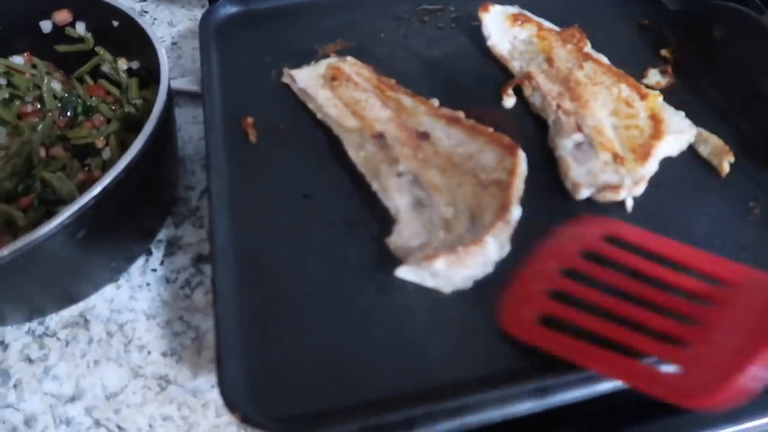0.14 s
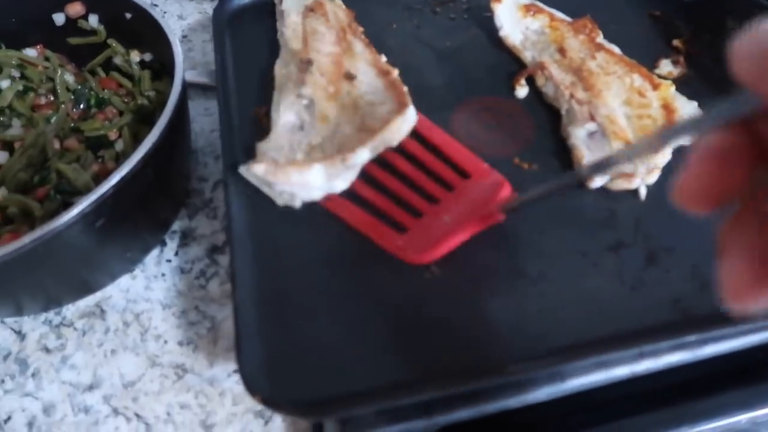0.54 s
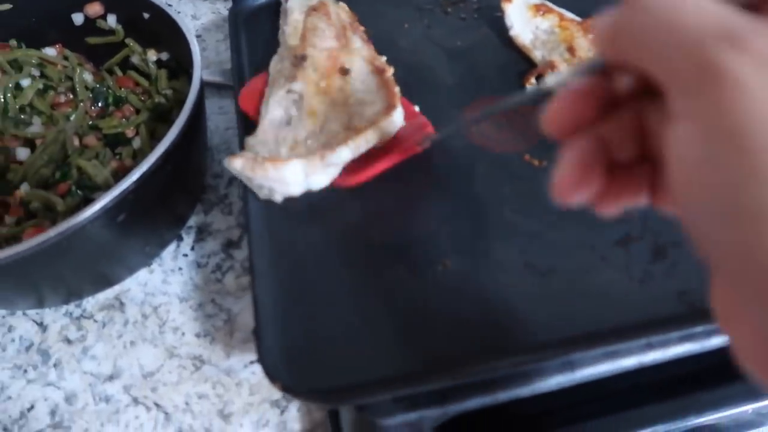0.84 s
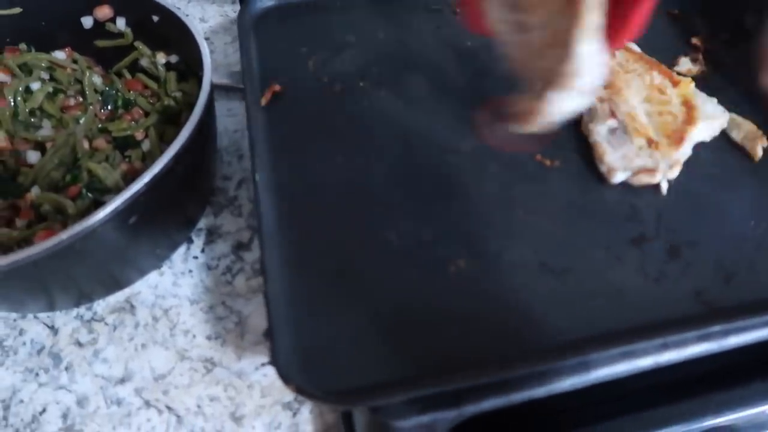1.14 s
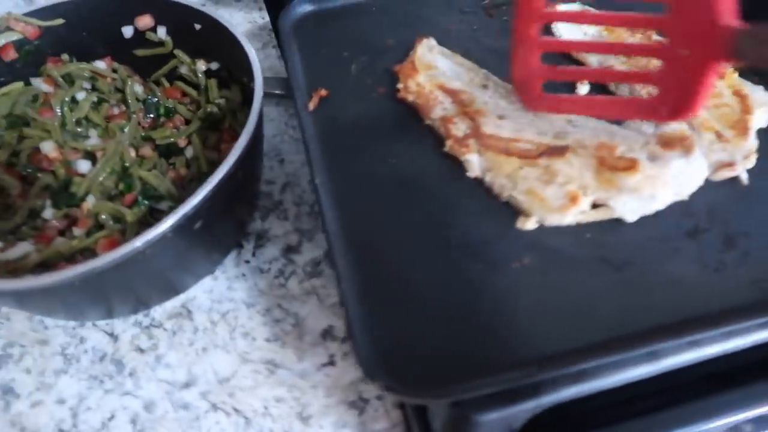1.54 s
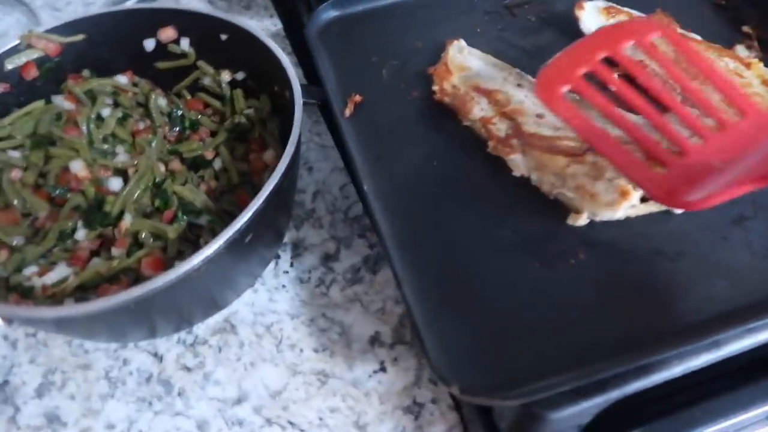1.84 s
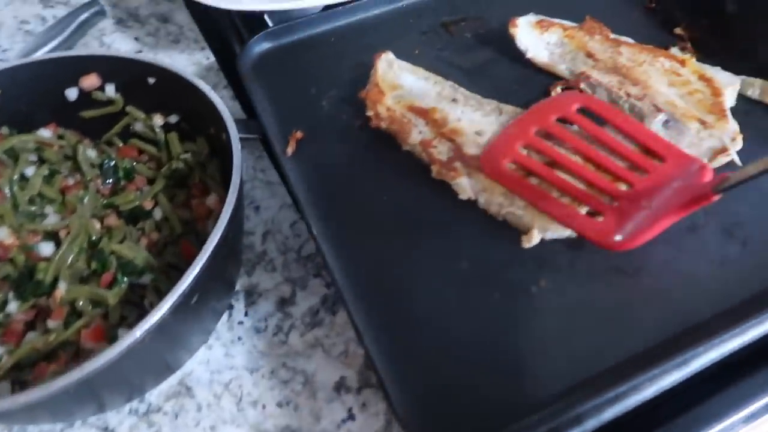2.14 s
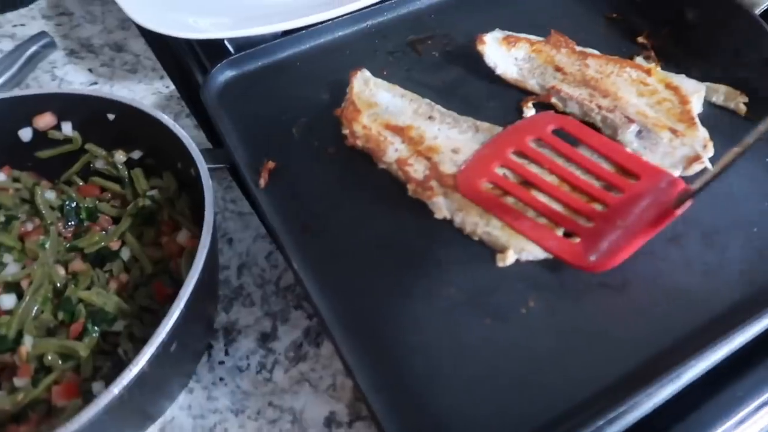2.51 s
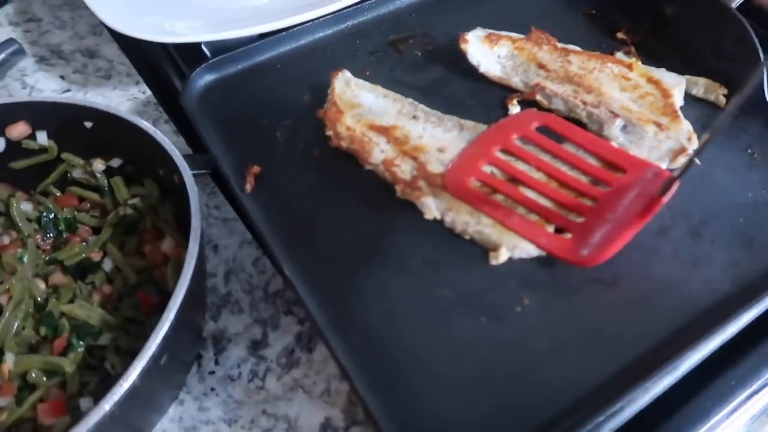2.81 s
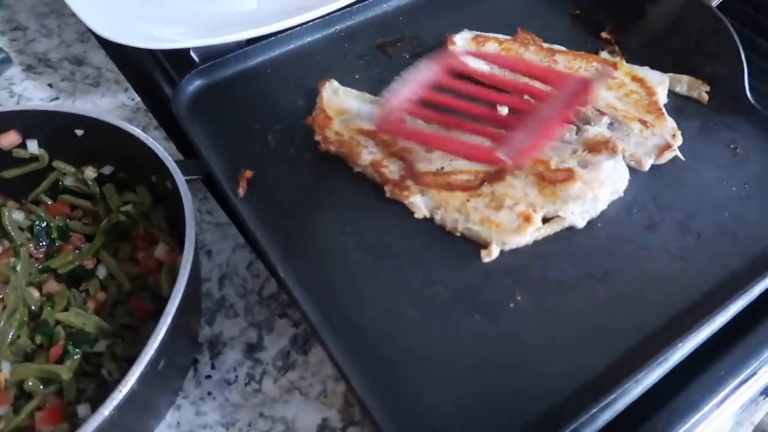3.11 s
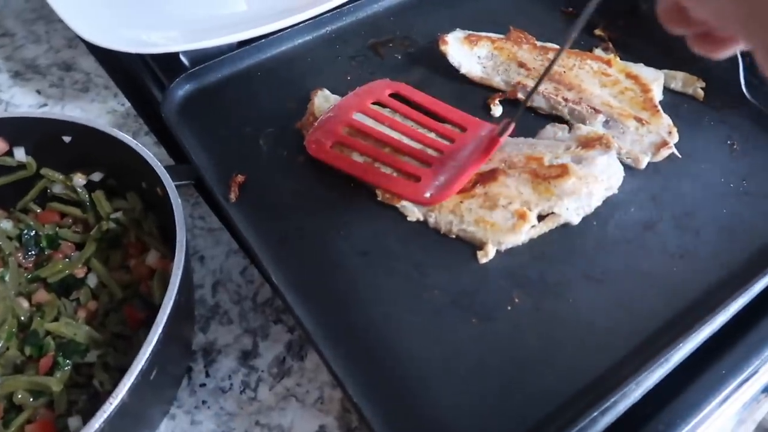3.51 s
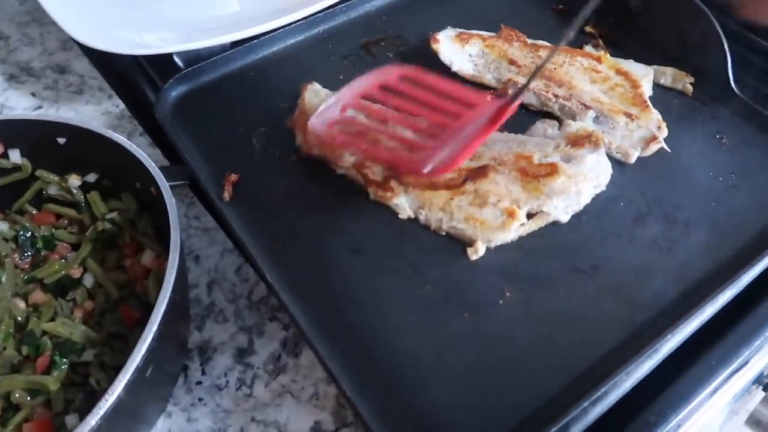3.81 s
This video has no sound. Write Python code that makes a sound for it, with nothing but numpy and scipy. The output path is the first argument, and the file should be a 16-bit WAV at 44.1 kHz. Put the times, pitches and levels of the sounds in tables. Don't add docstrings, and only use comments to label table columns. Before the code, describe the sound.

Meat sizzles finely and steadily in oil on a flat griddle, close by in stereo, with small dry crackles. A faint knock comes at 0.3 s; at 1.47 s the flipped piece lands with a soft dull slap, followed by fat spits until 2 s. Pressing swells a coarser, lower sizzle from 2.1 to 3.3 s, again at 3.45-3.9 s, ending in sharp pops. Low fan hum in a small kitchen.

```python
import sys
import numpy as np
from scipy import signal
from scipy.fft import rfft, irfft
from scipy.io import wavfile

SR = 44100
rng = np.random.default_rng(int(sys.argv[2]) if len(sys.argv) > 2 else 0)


def amplitude_ratio(level_db):
    exponent = np.asarray(level_db, float) / 20
    return 10 ** exponent


def file_out(sig):
    cols = np.atleast_2d(sig).T
    lim = np.clip(cols, -1, 1)
    pcm = np.round(lim * 32767).astype(np.int16)
    wavfile.write(sys.argv[1], SR, pcm)


N = 174195
TIME_S = np.arange(N) / SR
HZ = np.fft.rfftfreq(N, 1 / SR)


def colour(points):
    hz, db = np.transpose(points)
    gain = amplitude_ratio(np.interp(np.log(HZ + 1), np.log(hz), db))
    return gain / (1 + (0.8 * hz[0] / (HZ + 1)) ** 4)


def bells(rows):
    return amplitude_ratio(sum(db / (1 + (2 * (HZ - hz) / width_hz) ** 2) for hz, width_hz, db in rows))


def low_cut(x, hz):
    return signal.sosfilt(signal.butter(2, hz, "high", fs=SR, output="sos"), x)


def dull(x, hz, order=2):
    return signal.lfilter(*signal.butter(order, hz, fs=SR), x)


def drift(rate_hz):
    r = np.exp(-80 * np.pi * rate_hz / SR)
    noise = rng.standard_normal(N // 40 + 2002)
    slow = signal.lfilter([1], [1, -2 * r, r * r], noise)[2000:]
    return np.interp(np.arange(N) / 40, np.arange(len(slow)), slow / slow.std())


def ring(clicks, hz, t60_s):
    r, w = amplitude_ratio(-60 / (t60_s * SR)), 2 * np.pi * hz / SR
    return signal.lfilter([0, np.sin(w)], [1, -2 * r * np.cos(w), r * r], clicks + 1e-18)


def stereo(near, other, gain):
    # freq_hz, side_over_mid_db
    width = [(450, -15), (1000, -36), (1500, -24), (2200, -15.5), (3000, -13.5), (5200, 0), (7500, -4),
             (11000, 6.5), (15000, 10.5)]
    lag_share = 0.25
    near, other = rfft(near) * gain, rfft(other) * gain
    mid = irfft(near, N)
    mixed = np.sqrt(1 - lag_share ** 2) * other - 1j * lag_share * near
    side = irfft(colour(width) * mixed, N)
    return np.array([mid + side, mid - side])


def sizzle(per_s, spread_db, cycles, patchy_db, gain):
    together_share, treble_patchy_db = 0.42, 6.5
    heights = amplitude_ratio(spread_db * np.minimum(rng.exponential(1, N), 6))
    bursts = heights * (rng.random(N) < per_s / SR) * rng.choice([-1, 1], (2, N))
    pitches_hz = np.geomspace(500, 15000, num=24)
    together = drift(14.0)
    dealt = rng.choice(24, N, p=pitches_hz / pitches_hz.sum())
    out = 0
    for k, hz in enumerate(pitches_hz):
        rings = ring(bursts * (dealt == k), hz, cycles / hz)
        top_db = treble_patchy_db * (hz / 15000) ** 4.8 * drift(13.0) * [[1], [0]]
        level_db = patchy_db * (together_share * together + drift(3.2)) + top_db
        out = out + rings / rings.std() * np.sqrt(hz) * amplitude_ratio(level_db)
    pair = stereo(*out, gain)
    return pair / pair.mean(0).std()


def frying():
    # time_s, level_db
    vigour = [(0, -27.5), (.12, -27), (.3, -27), (.41, -29), (.62, -25.5), (.75, -28), (.78, -30.5),
              (.93, -28), (1.1, -30.5), (1.29, -30), (1.42, -26.5), (1.52, -27.5), (1.76, -28.5),
              (1.94, -29), (2.1, -28), (3.3, -27.5), (3.43, -29.5), (3.95, -29.5)]
    # freq_hz, db_per_hz
    fine_colour = [(700, -26.5), (850, -10), (2400, -6), (3800, -4.5), (8000, -6), (10500, -10),
                   (12500, -14.5), (15500, -27.5)]
    # freq_hz, width_hz, lift_db
    hollows = [(4360, 350, 1), (5390, 220, -0.5), (6450, 300, 0), (7600, 290, 2), (8800, 330, 2)]
    time_s, level_db = np.transpose(vigour)
    fine = sizzle(per_s=14000, spread_db=2, cycles=13.7, patchy_db=1.12,
                  gain=colour(fine_colour) * bells(hollows))
    return amplitude_ratio(np.interp(TIME_S, time_s, level_db)) * fine


def pressing():
    # start_s, rise_s, let_go_s, fall_s, level_db, trapped_steam_share (0-1)
    pushes = [
        (.48, .1, .66, .1, -32, .2),
        (1.365, .025, 1.43, .04, -30, .2),
        (1.55, .15, 1.75, .1, -33, .4),
        (2.13, .08, 2.24, .1, -35, .3),
        (2.06, .36, 3.05, .28, -21.6, .9),
        (3.435, .03, 3.82, .07, -23, .3),
    ]
    # freq_hz, db_per_hz
    coarse_colour = [(290, -10), (500, -14), (629, -18.5), (888, -7), (1450, -9), (2430, -2.5),
                     (9650, -10.5), (13800, -26), (15500, -35)]
    # freq_hz, width_hz, lift_db
    pockets = [(1160, 190, 0.5), (1670, 52, 5), (2337, 23, 7), (2430, 37, -1.5), (3140, 83, 0.5),
               (4910, 120, 7), (6160, 310, 1)]
    swell_db = 2.5
    coarse = sizzle(per_s=10000, spread_db=0.13, cycles=10.3, patchy_db=1.24, gain=colour(coarse_colour))
    hollow = irfft(rfft(coarse) * bells(pockets), N)
    out = 0
    for start_s, rise_s, go_s, fall_s, db, share in pushes:
        full_s = start_s + rise_s
        go_s = max(go_s, full_s + 0.002)
        push = np.interp(TIME_S, [start_s, full_s, (full_s + go_s) / 2, go_s, go_s + fall_s],
                         [0, amplitude_ratio(db - swell_db), amplitude_ratio(db), amplitude_ratio(db - swell_db / 2), 0])
        out = out + push * (share * hollow + (1 - share) * coarse)
    return out


def gaps(sizzling):
    # start_s, end_s, freq_hz, width_hz, added_share_db
    open_gaps = [(0.105, 0.705, 3000, 200, -11), (.1, 0.588, 5400, 130, 1), (.78, 1.152, 5250, 200, 0),
                 (1.353, 1.458, 5360, 200, -2), (2.147, 2.47, 3380, 500, -3), (2.2, 2.66, 4810, 99, -7),
                 (0.558, .68, 3180, 497, -22), (0.798, 1.3, 3570, 160, -11), (1.28, 1.4, 1690, 120, -5),
                 (1.553, 1.9, 3620, 300, -11), (1.6, 1.9, 4900, 200, -12), (2.304, 2.653, 2040, 60, -2),
                 (2.256, 3.126, 2345, 40, -0.5), (2.4, 3.1, 1140, 70, 0), (2.658, 3.058, 2880, 198, -9),
                 (2.7, 3.1, 2480, 199, -8.5), (2.667, 3.12, 4800, 120, -8), (3.44, 3.8, 1740, 130, -0.5),
                 (3.435, 3.616, 900, 250, -5), (3.6, 3.724, 3260, 350, -6), (3.702, 3.834, 2310, 120, -2.5),
                 (3.553, 3.63, 6400, 300, 1.5)]
    fade_s = 0.027
    out = sizzling
    for start_s, end_s, hz, width_hz, db in open_gaps:
        r = np.exp(-np.pi * width_hz / SR)
        poles = [1, -2 * r * np.cos(2 * np.pi * hz / SR), r * r]
        rung = signal.lfilter([(1 - r * r) / 2, 0, (r * r - 1) / 2], poles, sizzling)
        is_open = np.interp(TIME_S, [start_s - fade_s, start_s, end_s, end_s + fade_s], [0, 1, 1, 0])
        out = out + amplitude_ratio(db) * rung * is_open
    return out


def spits():
    # start_s, peak_db, pitch_hz
    fat_spits = [(0.2934, -16, 5390), (0.3058, -19.5, 290), (1.4695, -12, 900), (1.47, -14, 1750),
                 (1.3774, -19, 3350), (1.3866, -14, 1690), (1.3905, -12, 2900), (1.5958, -16, 1490),
                 (1.6995, -11, 3900), (1.7292, -22, 2200), (1.842, -18, 2000), (1.8512, -10, 4730),
                 (1.9575, -13, 3800), (3.8135, -10, 2330), (3.8155, -5, 4000), (3.8205, -19, 2300),
                 (3.8255, -10, 3600), (3.831, -17, 3000)]
    spray_db, spray_t60_s, pop_cycles = -14.5, 0.039, 1.7
    out, t = np.zeros((2, N + SR)), np.arange(SR // 10) / SR
    for start_s, db, hz in fat_spits:
        spray = amplitude_ratio(spray_db - 60 * t / spray_t60_s) * rng.standard_normal((2, len(t)))
        spray = spray * np.sqrt(hz / SR * 12.0)
        click = (t == 0) * np.array([[1], [-1]])
        pop = ring(click + spray, hz, pop_cycles / hz)
        i = int(start_s * SR)
        out[:, i:i + len(t)] += amplitude_ratio(db + 5.5) * low_cut(pop, hz / 3)
    return stereo(*out[:, :N], 1 / (1 + (HZ / 11000) ** 2))


def cracks():
    # start_s, peak_db, lowest_hz, top_hz
    droplets = [(.0941, -16, 2000, 6000), (.1796, -17, 5000, 10000), (.3614, -16, 4000, 8000),
                (.4261, -13, 3000, 7500), (.5253, -15, 3500, 10000), (.5867, -13, 1800, 8000),
                (.639, -19, 2000, 4500), (.7109, -14, 2800, 8000), (.8209, -15, 1600, 7000),
                (.8395, -18, 2500, 7000), (.9399, -17, 4000, 9000), (.9502, -16, 1800, 8000),
                (1.0531, -13, 2800, 8000), (1.1248, -18, 3500, 9000), (1.4224, -14, 4500, 10000),
                (1.6995, -13, 1500, 6000), (1.7271, -14, 1800, 8000), (1.8459, -12, 1200, 7000),
                (1.9567, -11, 4000, 13000), (2.0176, -18, 2500, 6500), (2.828, -8, 1500, 4500),
                (2.9125, -9, 2000, 7000), (3.5304, -8, 3000, 8000), (3.7217, -10, 1800, 6000),
                (3.8128, -8, 2000, 8000)]
    fizz_db, fizz_t60_s, level_db, side_share = -19, 0.04, 1.5, 0.26
    out, t = np.zeros(N + SR), np.arange(SR // 10) / SR
    for start_s, db, low_hz, top_hz in droplets:
        snap = (t == 0) + amplitude_ratio(fizz_db - 60 * t / fizz_t60_s) * rng.standard_normal(len(t))
        snap = low_cut(dull(snap, top_hz), low_hz)
        i = int(start_s * SR)
        out[i:i + len(t)] += amplitude_ratio(db + level_db) * snap / np.abs(snap[:20]).max()
    out = out[:N]
    return out + side_share * (stereo(out, out, 1) - out)


def knocks():
    # start_s, peak_db, lowest_hz, softness_cut_hz
    contacts = [(.3045, -18, 170, 300), (.3075, -28, 750, 1000), (.3145, -21, 350, 700),
                (.325, -21, 370, 500), (.336, -23, 370, 500), (.79, -25, 750, 950), (.856, -23, 750, 950),
                (1.466, -30, 300, 900), (1.4688, -12, 300, 1300), (1.4705, -14, 110, 220),
                (1.483, -23, 350, 1200), (1.492, -24, 350, 1200), (1.507, -27, 350, 1200),
                (1.535, -26, 450, 900), (1.555, -23, 110, 200)]
    # freq_hz, level_db, t60_s
    plate = [(158, -4.5, 0.16), (230, -10, 0.08), (296, 0, 0.032), (425, 0, 0.088), (576, -3, 0.04),
             (683, -6.5, 0.038), (840, 5.5, 0.051), (900, 3.5, 0.023), (1185, 1.5, 0.026),
             (1380, -8, 0.022), (1690, 9, 0.019), (1990, 9.5, 0.02)]
    rattle_db, rattle_t60_s, rattle_top_hz = -19, 0.25, 1100
    out, t = np.zeros(N + SR), np.arange(SR // 3) / SR
    for start_s, db, low_hz, cut_hz in contacts:
        luck_db = rng.normal(0, 1, len(plate))
        rattle = 0.32 * dull(rng.standard_normal(len(t)), rattle_top_hz, order=1)
        blow = (t == 0) + amplitude_ratio(rattle_db - 60 * t / rattle_t60_s) * rattle
        rings = 0
        for k, (hz, level_db, t60_s) in enumerate(plate):
            rings = rings + (-1) ** k * amplitude_ratio(level_db + luck_db[k]) * ring(blow, hz, t60_s)
        thud = dull(low_cut(low_cut(rings, low_hz), low_hz), cut_hz)
        i = int(start_s * SR)
        out[i:i + len(t)] += amplitude_ratio(db - 8) * thud
    out = out[:N]
    return stereo(out, out, 0.95)


def room(x):
    cloud_db, t60_s = -8.5, 0.38
    t = np.arange(SR // 4) / SR
    cloud = rng.standard_normal(len(t)) * amplitude_ratio(-60 * t / t60_s) * (t > 0.002)
    echo = (t == 0) + amplitude_ratio(cloud_db) * cloud / np.sqrt(np.sum(cloud ** 2))
    return signal.fftconvolve(x, echo[None] / np.sqrt(np.sum(echo ** 2)))[:, :N]


def kitchen():
    # freq_hz, db_per_hz
    air_colour = [(25, -17), (70, -10.5), (172, -5), (291, 0), (652, -8.5), (875, -4.5), (1130, -2.5),
                  (1500, -2.5)]
    # freq_hz, rms_db, phase_turns
    hums = [
        (60, -59.5, .0),
        (58.21, -60.5, .79),
    ]
    air_db, air_patchy_db = -42, 1
    air = stereo(*rng.standard_normal((2, N)), colour(air_colour) / (1 + (HZ / 1800) ** 4))
    hum = sum(np.sqrt(2) * amplitude_ratio(db) * np.sin(2 * np.pi * (hz * TIME_S + turns)) for hz, db, turns in hums)
    return amplitude_ratio(air_db + air_patchy_db * drift(4.1)) * air / air.std() + hum


def scene():
    left_db = -0.5
    stove = room(gaps(frying() + pressing()) + spits() + cracks() + knocks())
    return (stove + kitchen()) * amplitude_ratio(np.array([[left_db / 2], [-left_db / 2]]))


def top_cut(x):
    return signal.sosfilt(signal.butter(12, 15760, fs=SR, output="sos"), x)


def record(dry):
    return top_cut(dry)


dry = scene()
out = record(dry)
file_out(out)
```